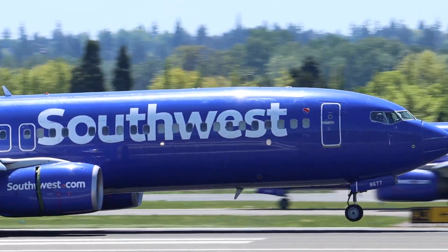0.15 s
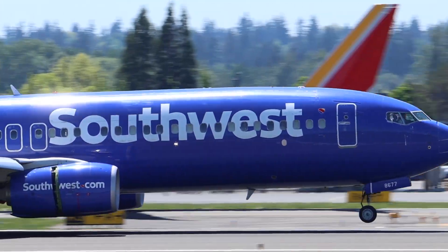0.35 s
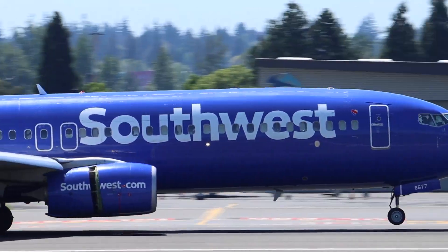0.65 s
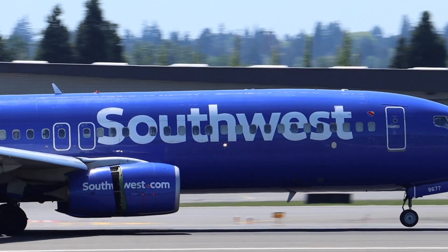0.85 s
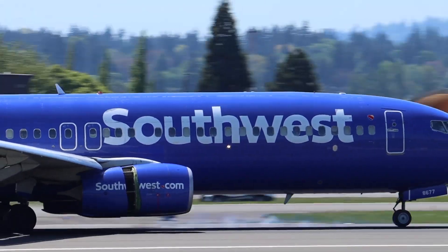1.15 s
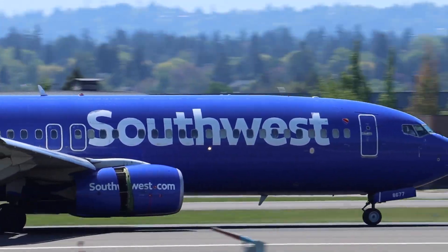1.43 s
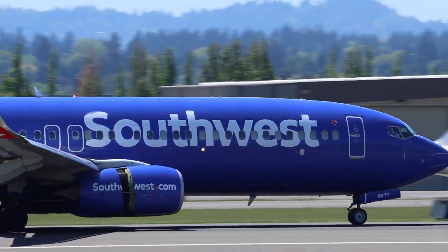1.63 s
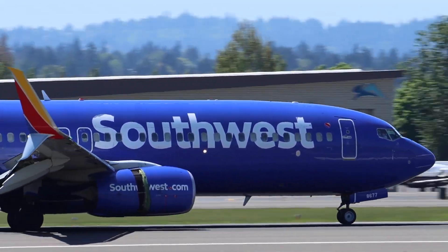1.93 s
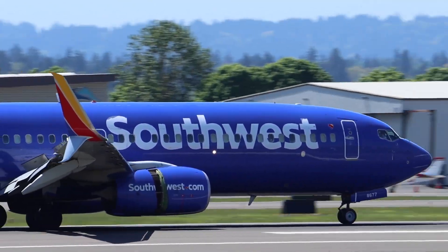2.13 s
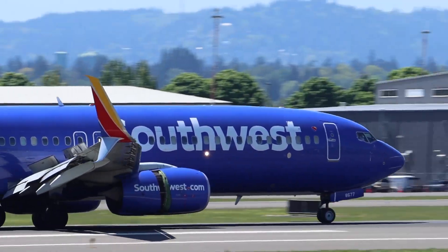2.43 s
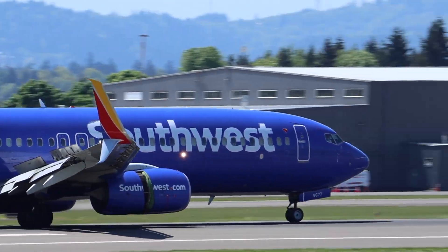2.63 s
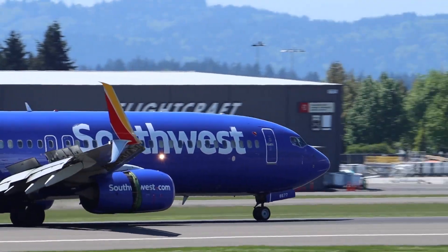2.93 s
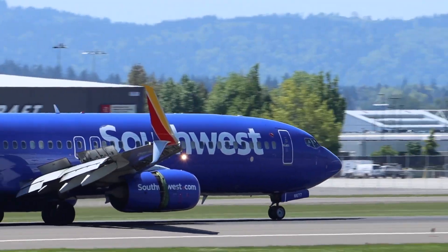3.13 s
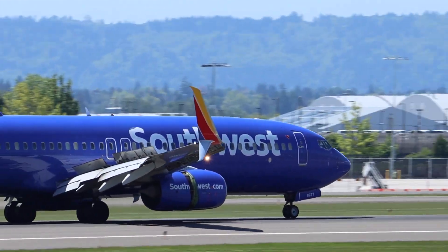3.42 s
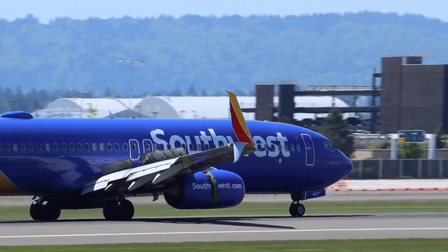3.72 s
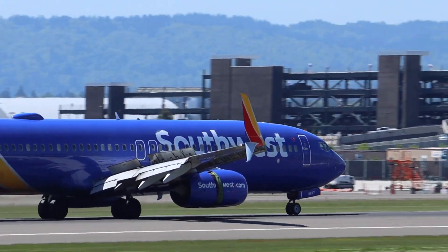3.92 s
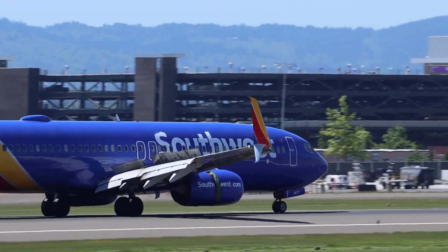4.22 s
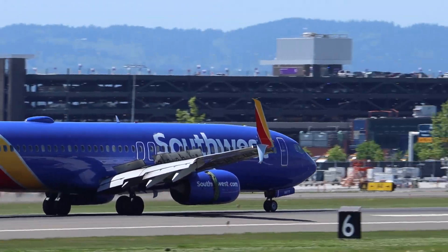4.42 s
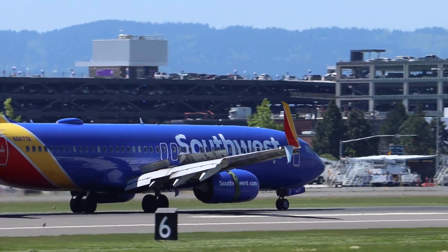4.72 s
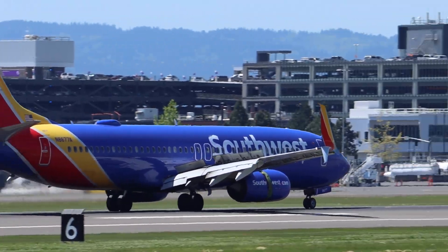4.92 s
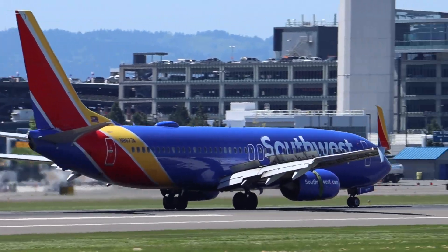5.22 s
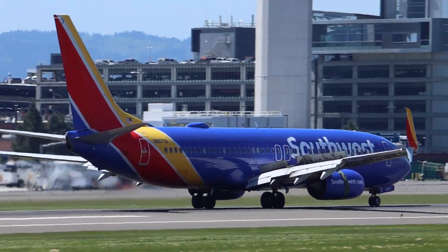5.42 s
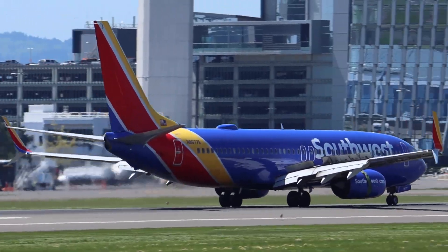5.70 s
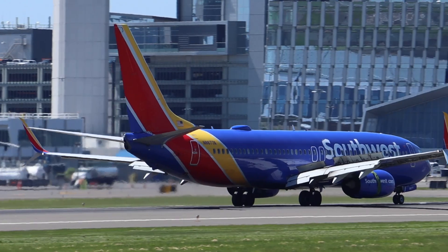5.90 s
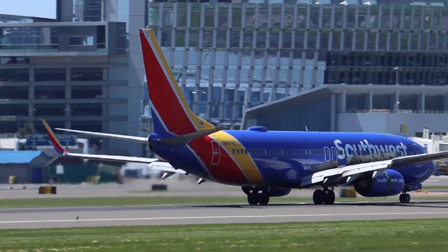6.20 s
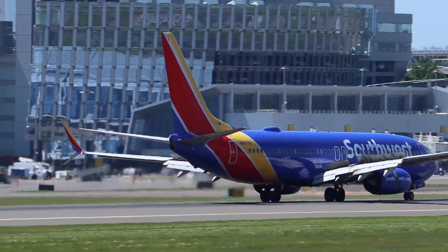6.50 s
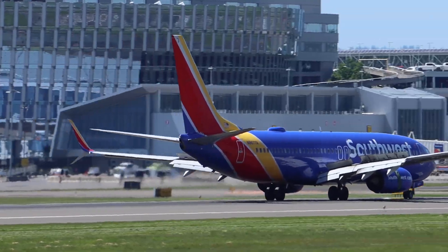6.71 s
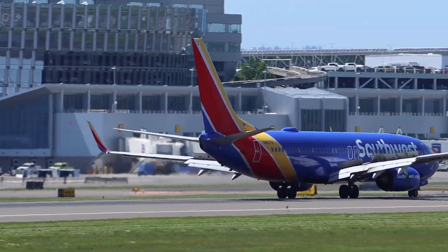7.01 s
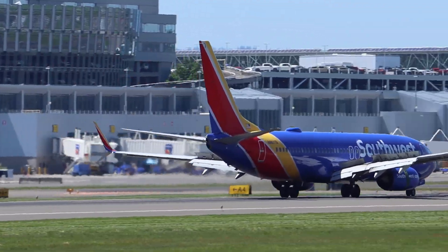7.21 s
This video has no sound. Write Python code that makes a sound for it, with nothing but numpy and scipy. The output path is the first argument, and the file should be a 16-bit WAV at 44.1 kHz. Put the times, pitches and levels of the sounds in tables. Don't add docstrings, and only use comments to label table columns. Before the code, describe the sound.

A distant airliner slows along a runway, heard across open grass through a close stereo microphone pair. At 0 seconds the jet noise is faint and nearly central, with slight electronic hiss and a soft low drone. From about 0.7 the reverse-thrust roar rises in rough surges, rushing and airy, its tone shifting between dull and bright as turbulent air bends it. Stronger swells come near 2.1 to 2.3 and 2.8, then it sinks around 3.3. Near 3.9 it surges again, the hiss vanishes, and a fluttering climb leads to the loudest blast around 5.1 to 5.8. The roar dips near 6.2, becoming deeper and fuller, then swells again towards 7 and remains strong to the end near 7.3. Beneath it, a steadier exhaust rumble builds until about 5 seconds, then eases only slightly. The whole sound drifts gently to the right.

```python
import sys
import numpy as np
from scipy import signal
from scipy.fft import rfft, irfft, next_fast_len
from scipy.io import wavfile
from scipy.ndimage import uniform_filter1d

SR = 44100
rng = np.random.default_rng(int(sys.argv[2]) if len(sys.argv) > 2 else 0)


def elevation(decibels):
    levels = np.asarray(decibels, float)
    return 10 ** (levels / 20)


def wrap_up_sound(samples):
    columns = np.atleast_2d(samples).T
    tamed = np.clip(columns, -1, 1)
    steps = np.round(tamed * 32767).astype(np.int16)
    wavfile.write(sys.argv[1], SR, steps)


N = 324135
STEP = 40
TAIL_TURNS_S = 5.07


def jet_roar(bearing_db, eddy_db, flutter_db, own_db):
    # pitch in Hz, level in dB per Hz.
    roar_colour = [(200, -39.5), (350, -15.5), (514, -1), (737, -2.5), (950, -1), (1150, -3), (1410, -0.65),
                   (2000, -4), (2350, -7.5), (3950, -15), (6090, -28.5), (7740, -43), (10600, -65),
                   (12500, -115)]
    path_hz = [700, 1500, 3300, 7800, 11000]
    # time in seconds, pitch in Hz.
    focus_track = [(0, 700), (.8, 646), (1.0, 1570), (1.35, 810), (1.55, 1440), (1.8, 700), (2.3, 1310),
                   (2.75, 820), (3.25, 900), (3.6, 1500), (4.1, 1010), (4.5, 1400), (5.2, 1400),
                   (5.7, 1090), (5.95, 900), (6.2, 1290), (6.6, 800), (7.2, 1300)]
    focus_gain_db, focus_octaves = 2.5, 0.51
    grass_edge_hz, grass_db_s = 480, 2

    roar_db, path_db = air_path()
    loudness = elevation(2 * roar_db)
    focus_hz, = in_time(focus_track)
    grass_db = grass_db_s * (control_times() - TAIL_TURNS_S)
    body, treble, far = [curve - np.average(curve, weights=loudness) for curve in path_db]
    top = far + .35 * (far - treble)
    shaping_db = np.array([body, 0 * body, treble, far, top])

    centres = np.geomspace(350, 11000, 18)
    eddies, flutter = drift(4.8), drift(40.0)
    out = 0
    for hz, (mid, side) in zip(centres, noise_bands(roar_colour, centres)):
        place = np.interp(np.log(hz), np.log(path_hz), np.arange(len(path_hz)))
        share = np.clip(1 - abs(place - np.arange(len(path_hz))), 0, 1)
        octaves_off = np.log2(hz / focus_hz)
        focus_db = focus_gain_db * np.exp(-(octaves_off / focus_octaves) ** 2)
        band_db = share @ shaping_db + focus_db + (hz < grass_edge_hz) * grass_db
        eddies = 1.02 * eddies + 0.36 * drift(2.7)
        shake_db = (hz / 2000) ** 0.71 * (eddy_db * eddies + flutter_db * flutter)
        shake_db = shake_db + own_db * drift(2.3)
        out = out + smooth_gain(band_db + shake_db) * to_ports(mid, side, hz, bearing_db)
    return smooth_gain(roar_db + 3.0) * out


def air_path():
    # time in seconds, level in dB, clarity (extra treble) in dB.
    roar_track = [(0.0, -47, 1), (0.55, -43.5, -0.5), (0.75, -35, -4.5), (1.0, -35.5, 1.5),
                  (1.3, -37.5, 0.5), (1.55, -32.5, 4), (1.85, -35, -1), (2.07, -26, -3.5), (2.3, -27, -4),
                  (2.45, -32.5, -5), (2.75, -27.5, -6.5), (3.35, -35.5, -0.5), (3.75, -32.5, 3.5),
                  (3.92, -25.5, 2), (5.17, -19, -1), (5.3, -22.5, 1.5), (6.15, -26, 5), (7.0, -21.5, 2.5)]
    # centre in seconds, length in seconds, roar lift in dB, extra treble in dB.
    air_pockets = [(0.31, .06, 3.5, -4), (0.68, 0.077, 0, 1.5), (0.978, 0.055, 2.5, 1.5),
                   (1.168, 0.054, 0, -4.5), (1.266, 0.068, 3, 2), (1.72, 0.035, 0, -2.5),
                   (1.824, 0.036, -0.5, 4), (2.3, 0.033, 2, -4.5), (2.565, 0.053, 3, 6.5),
                   (2.718, .06, -0.5, 0), (2.837, .07, 0.5, -1.5), (2.98, 0.053, -0.5, 3.5),
                   (3.25, 0.14, 1, -3.5), (3.621, 0.051, 0.5, -0.5), (3.874, 0.019, 0, 4),
                   (4.07, .045, 0.5, 5), (4.238, 0.1, -2, 1.5), (4.338, 0.036, 2, 2),
                   (4.493, 0.058, 1, -1.5), (4.627, .07, -3, 0), (4.741, .07, -1.5, -1),
                   (4.876, 0.071, 0, 1), (5.36, .07, -1, 3), (5.526, 0.1, 5, 1.5), (5.783, .2, 3.5, -0.5),
                   (6.336, 0.22, -0.5, -2.5), (6.57, 0.055, 0, -1), (6.7, .03, -0.5, 3.5),
                   (7.305, 0.1, -2, 1)]
    abeam_s, side_m, speed_m_s = 1.8, 223, 51.8
    treble_loss_db_m, far_loss_db_m = 0.0589, 0.1246
    far_clarity = 0.67
    far_lag = 0.41
    body_lag, body_span_s = 0.62, 0.27
    body_gain_db = 2.5

    roar_db, clarity_db = in_time(roar_track)
    t = control_times()
    centre_s, length_s, lift_db, extra_db = np.transpose(air_pockets)
    shape = np.exp(-((t[:, None] - centre_s) / length_s) ** 2)
    pocket_db = shape @ lift_db
    roar_db = roar_db + pocket_db
    clarity_db = clarity_db + shape @ extra_db

    further_m = np.hypot(side_m, speed_m_s * (t - abeam_s)) - side_m
    swell_db = roar_db - uniform_filter1d(roar_db, int(body_span_s * SR / STEP), mode="nearest")
    turn = abs(t - TAIL_TURNS_S) ** 0.53 * np.where(t > TAIL_TURNS_S, 1, .4)
    body_db = body_gain_db * turn - body_lag * swell_db
    treble_db = clarity_db - treble_loss_db_m * further_m
    far_db = far_clarity * clarity_db - far_lag * pocket_db - far_loss_db_m * further_m
    return roar_db, (body_db, treble_db, far_db)


def exhaust_rumble(bearing_db, lumpy_db):
    # time in seconds, level in dB.
    rumble_track = [
        (0, -48.5),
        (.7, -44),
        (2, -39.5),
        (3.4, -39),
        (4.1, -34),
        (5.1, -33),
        (6.2, -35),
        (7.35, -35),
    ]
    # pitch in Hz, level in dB per Hz.
    rumble_colour = [(15, -45), (25, -19), (46, -9), (75, 1), (119, -5), (170, -18.5), (280, -10.5),
                     (420, -7), (650, -24.5), (2000, -120)]
    dip_hz = 170
    ambience_db, fill_s = 9, 1.2
    upper_gain_db_s = 1.66

    rumble_db, = in_time(rumble_track)
    t = control_times()
    upper_db = upper_gain_db_s * np.maximum(t - TAIL_TURNS_S, 0)
    upper_db = upper_db - np.average(upper_db, weights=elevation(2 * rumble_db))
    centres = np.geomspace(30, 600, 9)
    out = 0
    for hz, (mid, side) in zip(centres, noise_bands(rumble_colour, centres)):
        fill_db = ambience_db * np.exp(-t / fill_s - np.log2(hz / dip_hz) ** 2)
        level_db = fill_db + upper_db * (hz > dip_hz) + lumpy_db * drift(3.4)
        out = out + smooth_gain(level_db) * to_ports(mid, side, hz, bearing_db)
    return smooth_gain(rumble_db + 3.5) * out


def microphone_hiss(shared):
    # time in seconds, level in dB.
    hiss_track = [
        (0, -74.5),
        (3.86, -70.5),
        (3.93, -108),
        (7.35, -108),
    ]
    # pitch in Hz, level in dB per Hz.
    hiss_colour = [(200, -13.5), (6000, 11.5), (9000, 8.5), (11000, -2), (13000, -2.5), (15700, 4.5),
                   (16500, -64.5)]
    patchy_db = 0.5

    size = next_fast_len(N)
    colour = elevation(at_hz(hiss_colour, np.arange(size // 2 + 1) * SR / size))
    noise = irfft(rfft(rng.standard_normal((3, size))) * colour, size)[:, :N]
    left, right, both = rms_one(noise)
    level_db = in_time(hiss_track)[0] + patchy_db * drift(6.0)
    return smooth_gain(level_db) * (np.array([left, right]) + shared * both)


def noise_bands(colour, centres_hz):
    # pitch in Hz, side level against the middle in dB.
    side_scatter = [(30, -32), (60, -50), (150, -17.5), (300, -20), (1000, -24), (2500, -27), (5000, -28.5),
                    (6800, -21.5), (8500, -8), (11000, -11.5)]
    size = next_fast_len(N)
    hz = np.arange(size // 2 + 1) * SR / size
    spectrum = rfft(rng.standard_normal((2, size))) * elevation(at_hz(colour, hz))
    spectrum[1] *= elevation(at_hz(side_scatter, hz))
    spectrum /= np.std(irfft(spectrum[0], size))
    place = np.interp(np.log(hz + 1e-3), np.log(centres_hz), np.arange(len(centres_hz)))
    for k in range(len(centres_hz)):
        band_share = np.clip(1 - abs(place - k), 0, 1)
        yield irfft(spectrum * band_share, size)[:, :N]


def to_ports(mid, side, hz, bearing_db):
    # pitch in Hz, share of the bearing.
    port_lean = [(60, 0.02), (170, .4), (300, .8), (510, 1.05), (1470, 2.1), (2510, .6), (4280, 0.02),
                 (9000, .1)]
    lean = smooth_gain(.5 * bearing_db * at_hz(port_lean, hz))
    return np.array([mid * lean + side, mid / lean - side])


def drift(rate):
    r = np.exp(-2 * np.pi * rate * STEP / SR)
    noise = rng.standard_normal(len(control_times()) + 2000)
    return rms_one(signal.lfilter([1], [1, -2 * r, r * r], noise)[2000:])


def control_times():
    return np.arange(0, N + STEP, STEP) / SR


def in_time(rows):
    s, *columns = np.transpose(rows)
    return [np.interp(control_times(), s, column) for column in columns]


def at_hz(points, hz):
    table_hz, values = np.transpose(points)
    return np.interp(np.log(hz + 1e-3), np.log(table_hz), values)


def smooth_gain(db):
    return np.interp(np.arange(N) / STEP, np.arange(len(db)), elevation(db))


def rms_one(x):
    return x / np.sqrt(np.mean(x ** 2) + 1e-20)


def scene():
    # time in seconds, left level over right in dB.
    bearing_track = [
        (0.0, -0.12),
        (2.5, -.3),
        (4.03, -0.5),
        (5.32, -1),
        (7.35, -1.1),
    ]
    bearing_db = in_time(bearing_track)[0]
    roar = jet_roar(bearing_db, eddy_db=.08, flutter_db=0.38, own_db=1.15)
    rumble = exhaust_rumble(bearing_db, lumpy_db=0.6)
    return roar + rumble


def top_cut(x):
    return signal.sosfilt(signal.butter(12, 15720, fs=SR, output="sos"), x)


def record(dry):
    mix = dry + microphone_hiss(shared=0.89)
    return top_cut(mix)


dry = scene()
out = record(dry)
wrap_up_sound(out)
```